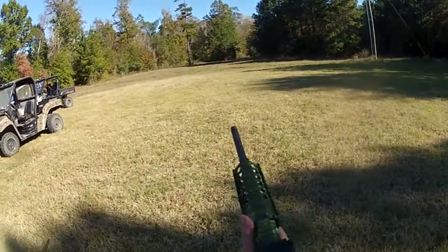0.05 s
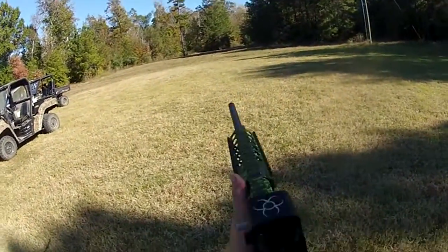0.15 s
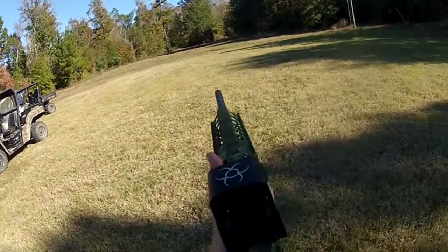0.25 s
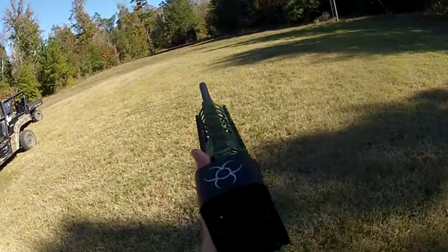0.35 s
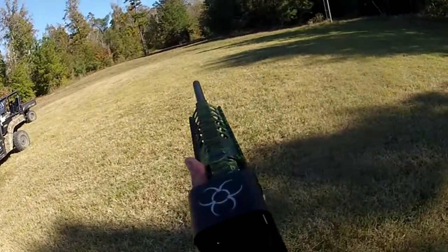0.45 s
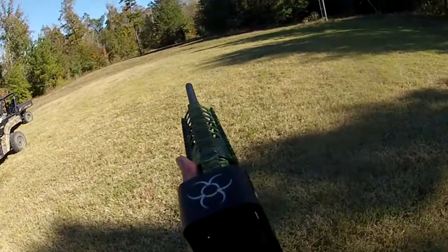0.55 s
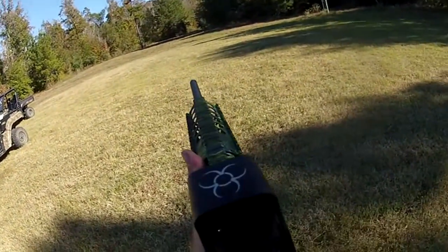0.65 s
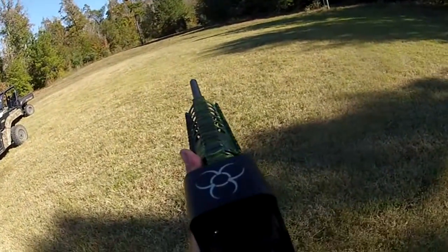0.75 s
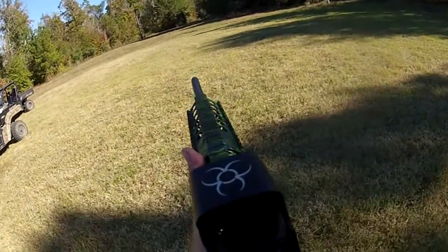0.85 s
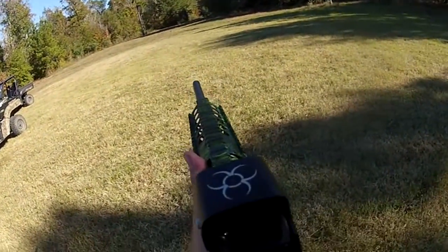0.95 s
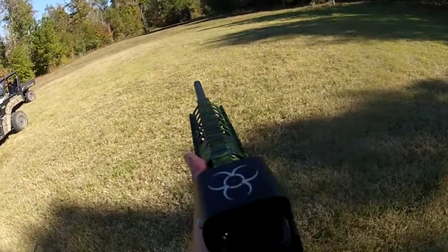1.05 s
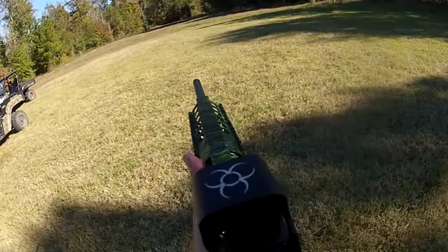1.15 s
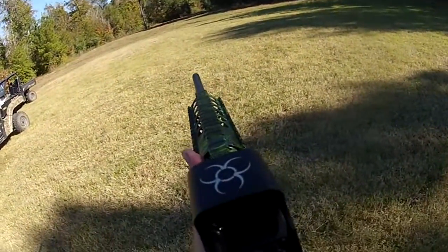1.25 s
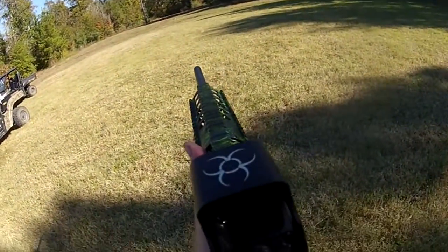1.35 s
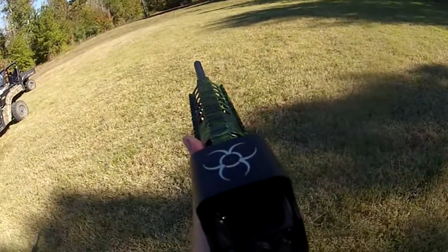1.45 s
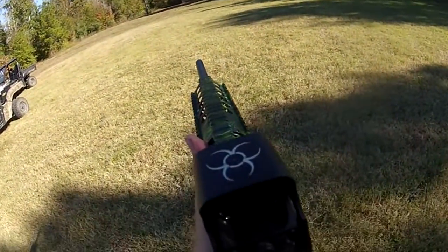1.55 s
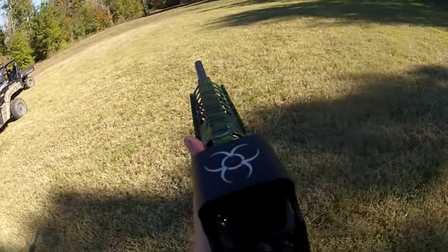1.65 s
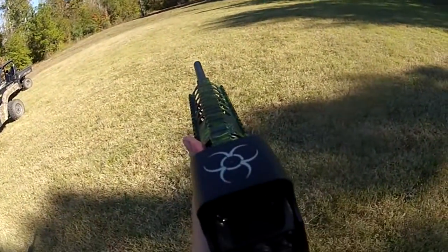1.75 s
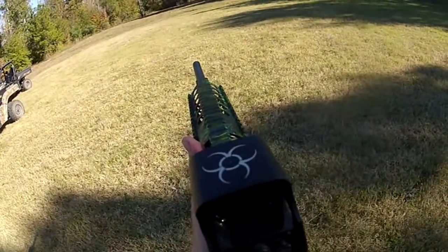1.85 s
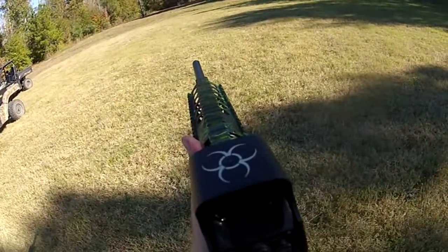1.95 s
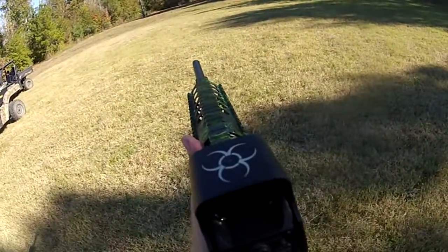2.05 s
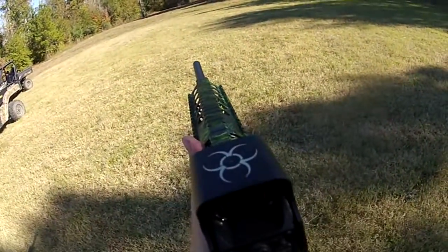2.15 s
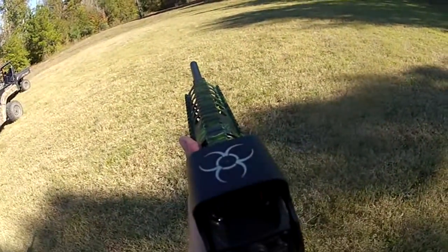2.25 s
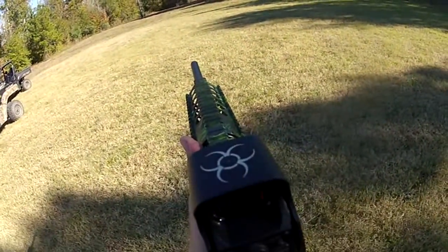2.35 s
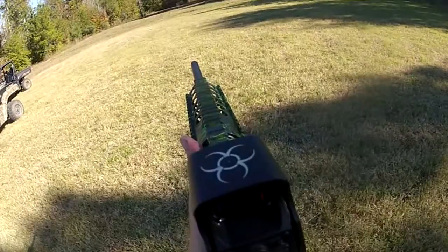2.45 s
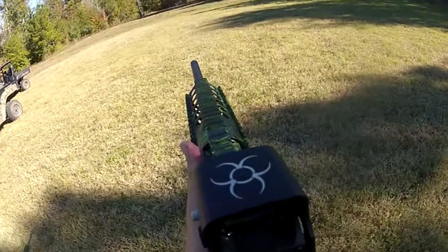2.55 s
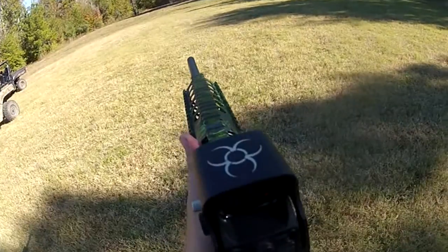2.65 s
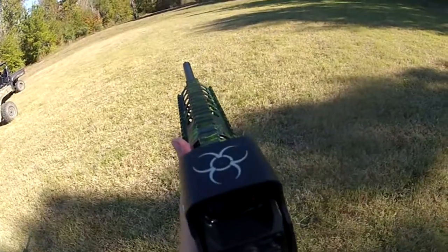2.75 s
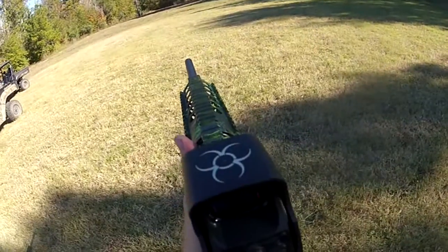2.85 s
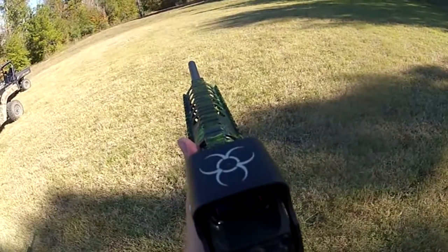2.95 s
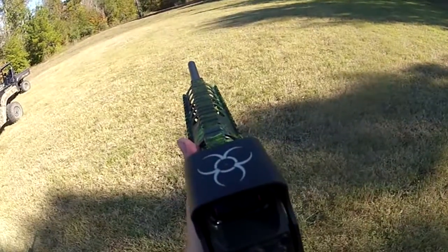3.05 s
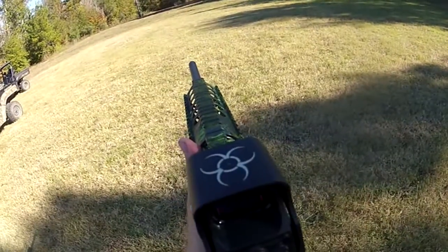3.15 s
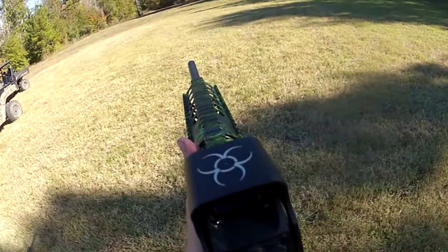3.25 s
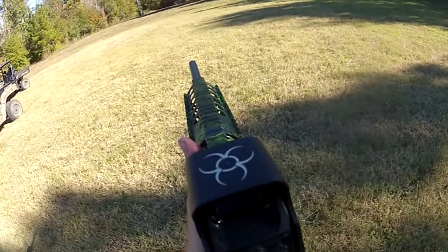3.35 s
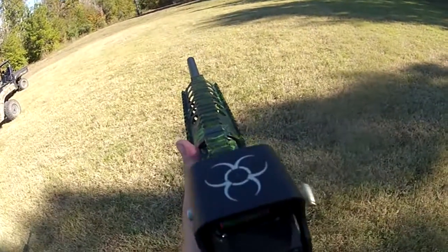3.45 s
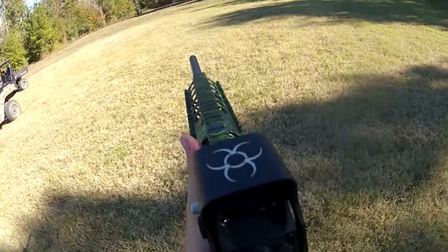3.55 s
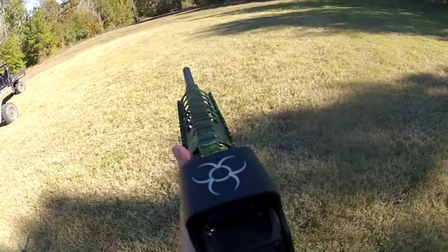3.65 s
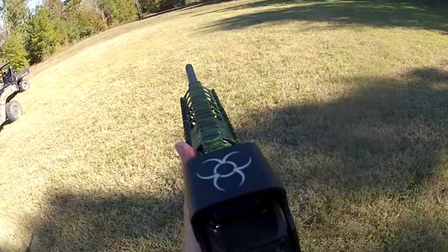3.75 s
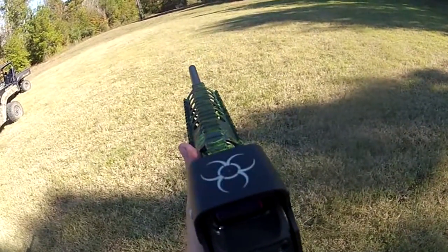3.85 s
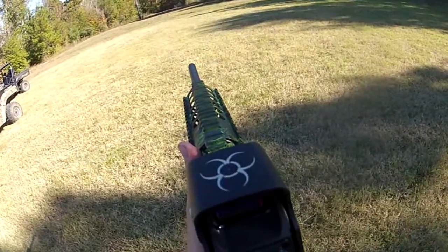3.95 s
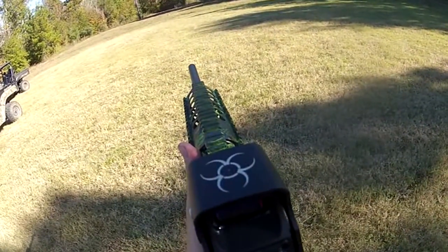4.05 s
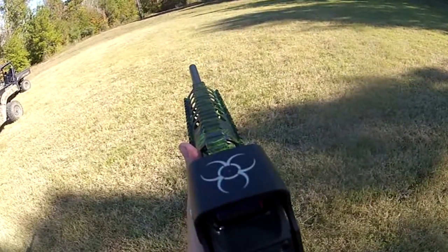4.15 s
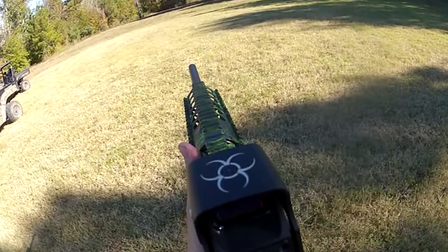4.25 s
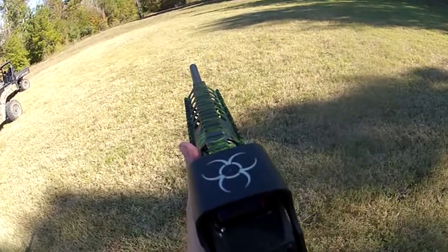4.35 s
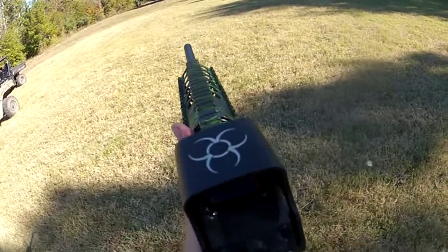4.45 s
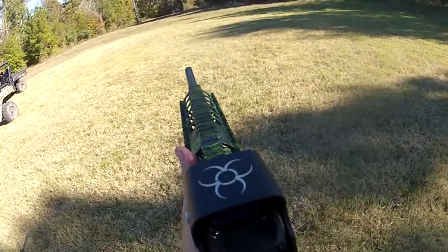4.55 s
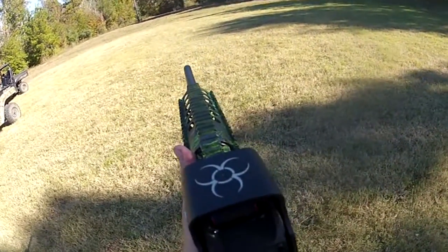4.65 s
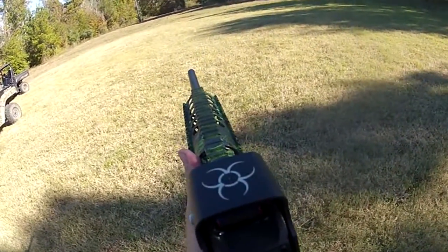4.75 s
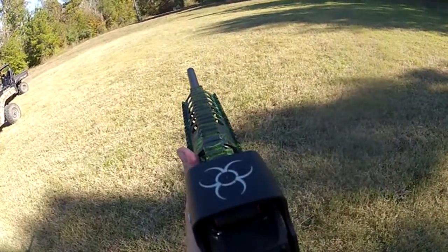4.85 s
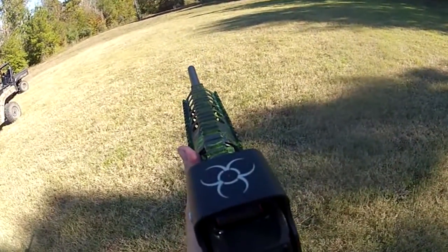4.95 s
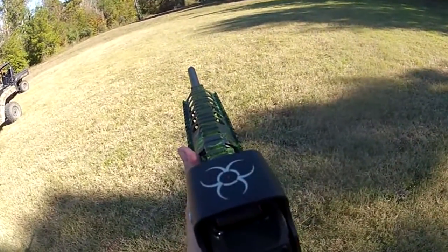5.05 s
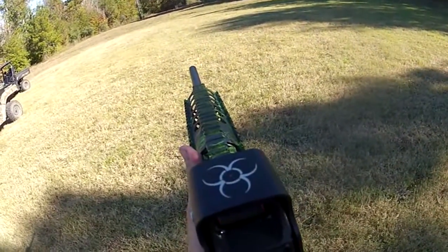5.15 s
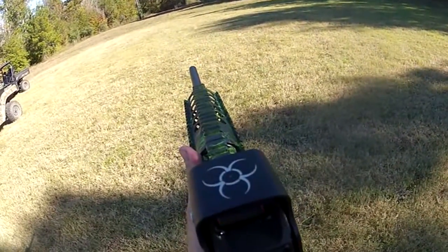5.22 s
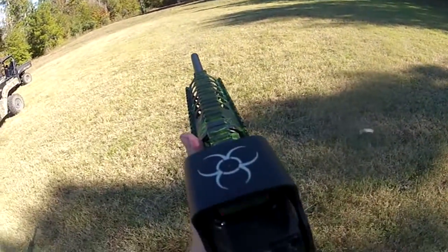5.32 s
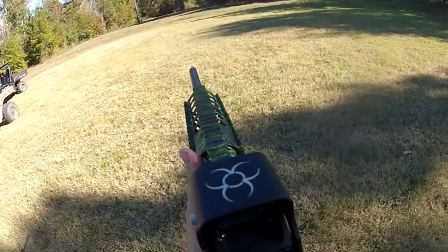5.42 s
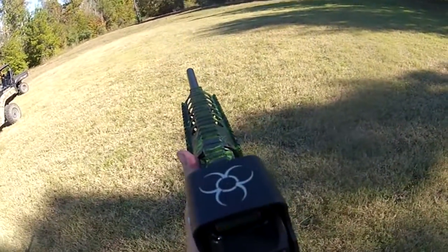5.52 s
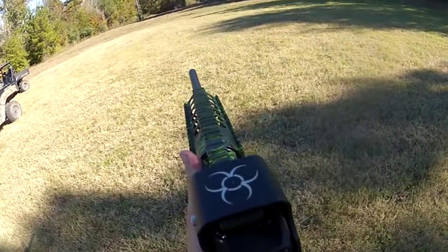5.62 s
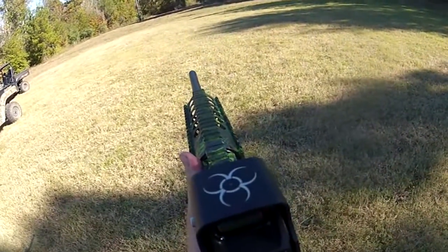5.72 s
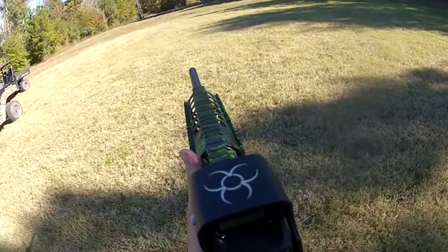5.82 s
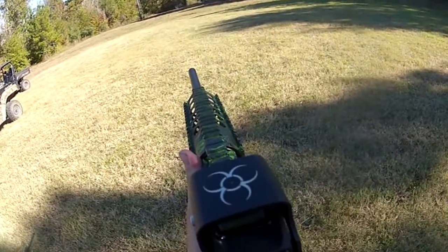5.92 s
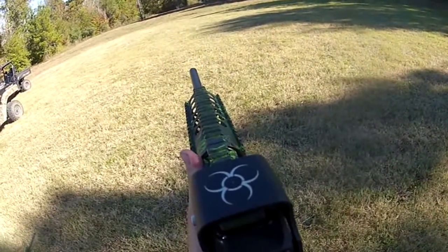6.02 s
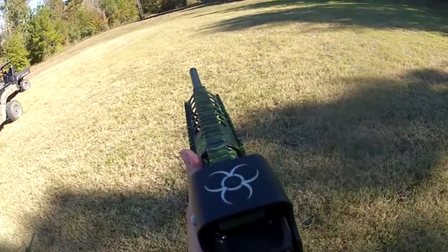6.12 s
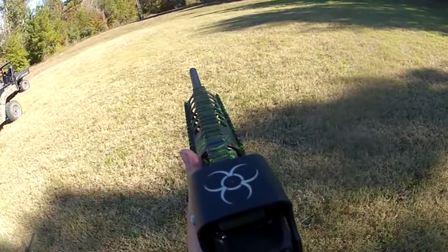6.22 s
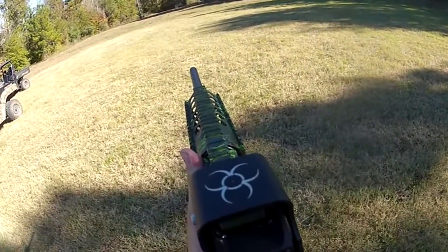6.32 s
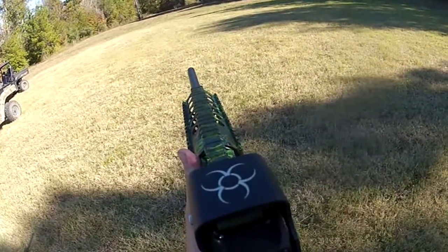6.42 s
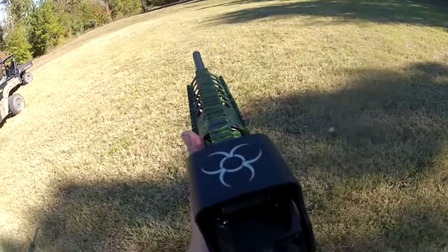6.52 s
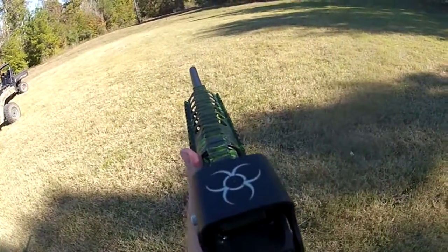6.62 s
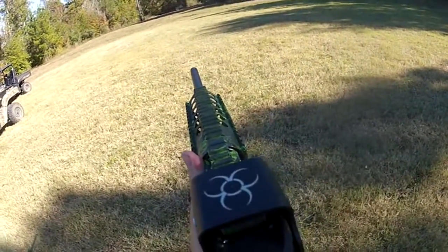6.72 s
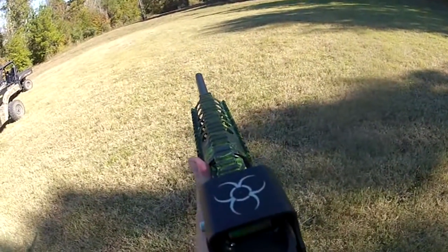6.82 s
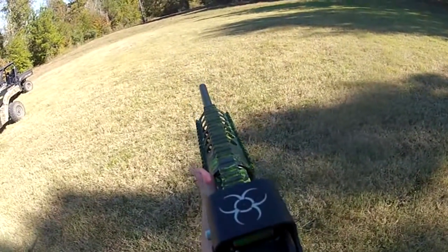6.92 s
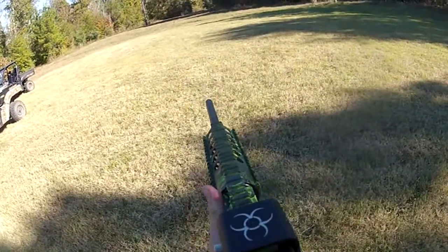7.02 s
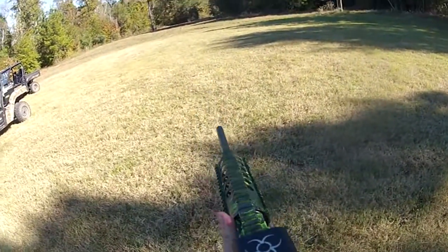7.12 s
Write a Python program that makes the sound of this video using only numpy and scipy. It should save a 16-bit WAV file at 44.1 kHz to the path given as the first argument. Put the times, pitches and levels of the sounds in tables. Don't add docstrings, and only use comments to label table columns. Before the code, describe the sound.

Close, body-worn sound from a small camera in a hard case, in an open field edged by trees. Low wind rumbles unevenly over a quiet hissy air floor. Around 0.3 s come a dull stock knock and a tiny latch click, then a faint tap at 0.5 s. Quiet wind continues until 2.6 s, when the rifle fires; further single shots follow at 3.5, 4.4, 5.3 and 6.5 s. Each begins with a tiny hammer tick and a very short, flat-clipped blast. Within about 0.15 s the bolt hits its rear stop, brass scrapes and rattles, the spring twangs faintly and the bolt slams home with a bounce, over soft low recoil thuds. A rough, crackling echo swells from the tree line about a quarter second after each blast, then deeper, duller returns fade away. The tone is boxy with a gritty metallic upper edge. The last echo trails off near 7.2 s.

```python
import sys
import numpy as np
from scipy import signal
from scipy.fft import rfft, irfft, next_fast_len
from scipy.io import wavfile
from scipy.ndimage import uniform_filter1d

SR = 44100
rng = np.random.default_rng(int(sys.argv[2]) if len(sys.argv) > 2 else 0)


def volts(x):
    e = np.asarray(x, float) / 20
    return 10 ** e


def to_wav(s):
    ch = np.atleast_2d(s).T
    pcm = np.round(np.clip(ch, -1, 1) * 32767)
    wavfile.write(sys.argv[1], SR, pcm.astype(np.int16))


N = 316638

# [t/s, far echo level/dB, roar length/s, gas push level/dB, gas push f/Hz]
SHOTS = [
    (2.5975, -1, 0.01, 6.5, 260),
    (3.4990, 0, .0105, 8.5, 300),
    (4.4301, 0.5, 0.0087, -5, 331),
    (5.3219, 0, 0.0083, 1.5, 584),
    (6.5142, 0, 0.01, 5, 558),
]
# [t/s, level/dB, hammer level of that cycle/dB]
BOLT = [
    (2.641, -2, -13),
    (3.539, 0.5, -10),
    (4.473, -3, -11.5),
    (5.361, -6, -12.5),
    (6.553, -1.5, -14),
]
# [f/Hz, level/dB]
STEEL = [(200, -16), (1000, -21), (1700, -1.5), (2500, 1.5), (3500, 3), (4500, 5), (6000, 9)]


def evened(x):
    return x / np.sqrt(np.mean(x ** 2) + 1e-20)


def read(points, hz):
    f, value = np.transpose(points)
    return np.interp(np.log(hz + 1), np.log(f + 1), value)


def add(mix, s, sound):
    part = mix[round(s * SR):][:len(sound)]
    part += sound[:len(part)]


def coloured(x, db_of):
    gain_db = np.maximum(db_of(abs(np.fft.fftfreq(8192, 1 / SR))), -100)
    log_gain = np.log(volts(gain_db))
    phase = -signal.hilbert(log_gain).imag
    taps = np.fft.ifft(np.exp(log_gain + 1j * phase)).real[:4096]
    return signal.oaconvolve(x, taps)[:len(x)]


def case_db(hz, base_db=-24):
    # [f/Hz, width/Hz, level/dB]
    resonances = [(957, 333, -12), (1284.5, 79, -3), (1796, 120, -5.5), (2162, 51, -3.5), (2407, 133, -1),
                  (3080, 81, -16), (3074, 120, -15.5), (3480, 340, -15.5), (5450, 400, -23)]
    power = sum(volts(2 * db) / (1 + (2 * (hz - f) / width) ** 2) for f, width, db in resonances)
    return 10 * np.log10(power + volts(2 * base_db))


def cased(x, source):
    def db_of(f):
        return read(source, f) + case_db(f) - 40 * (f > 6300)

    hz = np.linspace(0, SR / 2, 2000)
    return coloured(x, db_of) / np.sqrt(np.mean(volts(2 * db_of(hz))))


def knocks(events, source, rise_s=0.00016, spike=1.0, rattle_db=4.5):
    out, t = np.zeros(N), np.arange(6000) / SR
    for s, db, t60_s in events:
        hiss, lumps = rng.standard_normal((len(t), 2)).T
        rattle = volts(rattle_db * evened(uniform_filter1d(lumps, 30)))
        crack = 0.6 + spike * np.exp(-t / 0.0018)
        shape = volts(db - 60 * t / t60_s) * np.minimum(t / rise_s, 1) * crack
        add(out, s, shape * rattle * hiss * 0.5)
    return cased(out, source)


def in_cycle(times, part, db=0):
    delay_s, part_db, t60_s = part
    return np.transpose(np.broadcast_arrays(times + delay_s, db + part_db, t60_s))


def blasts(db=18, rise_s=0.0014, fall_s=0.00091):
    # [f/Hz, level/dB]
    colour = [(60, -1.5), (300, 10.5), (700, -2), (1300, -2.5), (2300, 2.5), (3500, 0), (6000, 13.5)]
    out, t = np.zeros(N), np.arange(2000) / SR
    for s, _, hold_s, push_db, push_hz in SHOTS:
        decay = np.exp(-np.maximum(t - hold_s + 0.0017, 0) / fall_s)
        shape = np.minimum(t / rise_s, 1) ** 3 * decay
        roar = volts(db) * cased(rng.standard_normal(2 * len(t)), colour)[len(t):]
        push = volts(push_db) * np.sin(2 * np.pi * (push_hz * t + rng.random()))
        add(out, s, shape * (roar + push))
    return out


def echoes(trunks_db=0.7, clumps_db=2.0, slap_s=0.0018, crack=2.3):
    # [delay/s, level/dB, build-up/(dB/s), fade/(dB/s)]
    woods = [
        (0.014, -12, 3401, 1141),
        (0.069, -28, 98, 203),
        (0.149, -22, 405, 162),
        (0.264, -16.5, 453, 57.5),
        (.3, -22.5, 107, 87),
        (0.458, -19.5, 77, 98.5),
        (0.622, -26.5, 57, 34.5),
    ]
    # [t/s, level over diffuse echo/dB]
    slaps = [(2.8607, -1), (2.8757, 3), (3.005, 1), (3.195, -7), (3.221, -2), (3.756, 4), (3.762, -25),
             (3.777, -1), (3.905, -7), (3.935, -2), (4.096, 4), (4.685, 2.5), (4.691, 0), (4.711, -2.5),
             (4.869, 0), (4.998, 3), (5.053, -4), (5.5787, 7), (5.5847, -3), (5.5997, 3.5), (5.7577, 1.5),
             (5.8897, 5), (6.771, 3.5), (6.792, -3), (6.92, -4), (6.95, -3), (7.049, 2), (7.082, 2)]
    # [f/Hz, loss/(dB/s)]
    air_loss = [(300, -6), (1000, -12), (2500, 2), (4000, 16), (6000, 31.5)]
    # [f/Hz, level/dB]
    colour = [(60, -17), (300, -7.5), (600, -7.5), (1000, -2.5), (3000, 5), (4500, 5.5), (6000, 9)]
    out, t = np.zeros(N), np.arange(round(1.5 * SR)) / SR
    trunks = volts(trunks_db * evened(uniform_filter1d(rng.standard_normal(len(t)), 150)))
    returns = sum(volts(2 * (db - np.maximum(rise * (at - t), fade * (t - at))))
                  for at, db, rise, fade in woods)
    for s, far_db, *_ in SHOTS:
        delay, slap_db = np.transpose([(at - s, db) for at, db in slaps if 0 < at - s < 0.8])
        after = np.maximum(t[:, None] - delay, 0) / slap_s
        bumps = after * np.exp(1 - after)
        scatter = trunks * (1 + bumps @ volts(slap_db)) * rng.standard_normal(len(t))
        scatter[np.round((delay + 0.0008) * SR).astype(int)] += crack * volts(slap_db)
        hz, frame_t, z = signal.stft(scatter, SR, nperseg=256)
        patches = uniform_filter1d(rng.standard_normal(z.shape), 5, 0)
        clumps = evened(uniform_filter1d(patches, 4, 1))
        colour_db = clumps_db * clumps - read(air_loss, hz)[:, None] * frame_t
        roar = signal.istft(z * volts(colour_db), SR, nperseg=256)[1][:len(t)]
        add(out, s, volts(far_db * (t > 0.245)) * np.sqrt(returns) * roar)
    return cased(out, colour)


def bolt():
    # [t/s, level/dB]
    landing = [
        (2.7311, -2.5),
        (3.634, -4),
        (4.572, -3),
        (5.4562, -3),
        (6.6565, -3),
    ]
    # [delay/s, level/dB, t60/s]
    bounces = [
        (0, 3, .08),
        (.0058, 0, .052),
        (0.011, -21, .06),
    ]
    # [delay/s, level/dB, t60/s]
    clack = (.002, -1, 0.028)
    # [delay/s, level/dB, t60/s]
    pin = (-0.0028, -12, 0.083)
    # [f/Hz, level/dB]
    home_colour = [(100, -17), (250, 3), (1000, -18.5), (1600, -17), (2000, 2), (2500, 2.5), (3500, 8.5),
                   (4500, 9), (6000, -1.5)]
    shot = np.transpose(SHOTS)[0]
    rear, rear_db, _ = np.transpose(BOLT)
    home, home_db = np.transpose(landing)
    hits = np.concatenate([in_cycle(home, bounce, home_db) for bounce in bounces] + [in_cycle(shot, pin)])
    stop = knocks(in_cycle(rear, (0, 0, 0.07), rear_db), STEEL, rise_s=0.0081)
    strike = knocks(in_cycle(rear, clack, rear_db), STEEL, rise_s=0.00064)
    return stop + strike + knocks(hits, home_colour, rise_s=0.00056, spike=0.3, rattle_db=4.0)


def hammer():
    # [delay/s, level/dB, t60/s]
    fall = (-.0066, 0, 0.032)
    # [f/Hz, level/dB]
    colour = [(200, -16), (1000, -2), (2000, 7), (3000, -3), (4000, 26.5), (6000, 12.5)]
    return knocks(in_cycle(np.transpose(SHOTS)[0], fall, np.transpose(BOLT)[2]), colour)


def spring():
    # [delay/s, level/dB, t60/s]
    turn_round = (.0826, -20.5, 0.047)
    # [f/Hz, level/dB]
    colour = [(2000, -22), (3000, -8), (3500, 5), (4000, 2), (6000, -28)]
    return knocks(in_cycle(np.transpose(SHOTS)[0], turn_round), colour, rise_s=0.00064)


def brass():
    # [delay/s, level/dB, t60/s]
    scrape = (-0.0085, -8.5, 0.089)
    # [t/s, peak level/dB]
    hits = [
        (2.6494, -16),
        (2.6604, -17),
        (3.552, -15),
        (3.5616, -10),
        (4.49, -21),
        (5.3803, -13),
        (6.5635, -26),
        (6.574, -16),
        (6.5793, -9),
    ]
    # [f/Hz, level/dB]
    colour = [(1000, 0.5), (2500, -1.5), (4000, 9), (5000, 9), (5600, 27), (6000, 8.5)]
    events = [*in_cycle(np.transpose(BOLT)[0], scrape), *[(s, db, 0.052) for s, db in hits]]
    return knocks(events, colour, rise_s=0.0014)


def thuds():
    # [buffer stop t/s, buffer level/dB, recoil level/dB, kick level/dB]
    body = [
        (2.6905, -18, -24, -11),
        (3.5895, -15, -20.5, -18),
        (4.527, -15, -27, -8),
        (5.4165, -16.5, -24, -9),
        (6.612, -16.5, -26, -12),
    ]
    out, t = np.zeros(N), np.arange(9000) / SR

    def swing(hz, tau_s):
        return (t / tau_s * np.exp(1 - t / tau_s)) ** 2 * np.sin(2 * np.pi * hz * t)

    for (s, *_), (stop, stop_db, recoil_db, kick_db) in zip(SHOTS, body):
        add(out, s + 0.00078, volts(kick_db) * swing(85, 0.004))
        add(out, s - 0.002, volts(recoil_db) * swing(49, 0.033))
        add(out, stop, volts(stop_db) * swing(31, 0.021))
    return out


def handling():
    # [t/s, peak level/dB, t60/s]
    clicks = [
        (0.347, -26.5, 0.024),
        (0.3544, -39, 0.04),
    ]
    stock_knock = [
        (.3222, -23, .022),
    ]
    tap = [
        (0.4915, -37, 0.035),
    ]
    # [f/Hz, level/dB]
    latch_colour = [(200, -23), (1000, -7), (2000, 2), (3000, -3), (4000, 21), (5200, 22), (6000, 10)]
    stock_colour = [(400, -10), (900, 2), (1100, 14), (1300, 2), (2200, -13), (4000, -23)]
    return knocks(clicks, latch_colour) + knocks(stock_knock, stock_colour) + knocks(tap, STEEL, rise_s=0.00064)


def mirror(rifle):
    # [f/Hz, level/dB]
    strength = [(5700, -41), (6000, -0.5), (7000, -3), (8500, -7), (9700, -12), (10800, -18.5),
                (11400, -29.5), (12000, -66), (12500, -23), (13300, -19), (13600, -23.5), (14000, -40.5),
                (16000, -26)]
    slow_hz = 12000
    folded = 2 * np.cos(2 * np.pi * slow_hz * np.arange(N) / SR) * rifle
    return coloured(folded, lambda f: read(strength, f))


def port_difference(middle):
    # [f/Hz, level/dB]
    ports = [(40, -16), (150, -10), (500, -22), (1500, -33.5), (5000, -22.5), (15000, -28)]
    n_fft = next_fast_len(N)
    gain = volts(read(ports, np.fft.rfftfreq(n_fft, 1 / SR)))
    return irfft(1j * rfft(middle, n_fft) * gain, n_fft)[:N]


def hush(spectrum, patchy_db, window=1024):
    # [f/Hz, level/dB]
    apart_db = [(60, -37), (110, -14.5), (200, -21.5), (380, -16.5), (700, -12), (1290, -10), (2380, -10),
                (4400, -5), (8120, -7), (15000, -25)]
    n_frames, hz = 4 * N // window + 5, np.fft.rfftfreq(window, 1 / SR)
    a, b, c, d, patches = rng.standard_normal((n_frames, len(hz), 5)).T
    patches = evened(uniform_filter1d(uniform_filter1d(patches, 10, 0), 14, 1))
    mid = a + 1j * b
    side = (c + 1j * d) * volts(read(apart_db, hz))[:, None]
    gain = volts(read(spectrum, hz)[:, None] + patchy_db * patches)
    z = np.array([mid + side, mid - side]) * gain
    return evened(signal.istft(z, nperseg=window, noverlap=window * 3 // 4)[1][:, :N])


def wind():
    # [t/s, level/dB]
    course = [(0, -47.5), (.33, -36.5), (.45, -41.5), (.62, -35), (.75, -41.5), (.93, -47), (1.05, -45),
              (1.3, -36), (1.42, -47), (1.72, -50), (1.82, -46), (2.0, -48.5), (2.5, -46.5), (3.3, -49.5),
              (4.3, -48.5), (5.3, -45.5), (6.2, -53.5), (7.18, -45)]
    # [f/Hz, density/dB per Hz]
    gust = [(8, -30.5), (14, 2.5), (32, -3), (46, 3.5), (58, -7.5), (75, -13), (100, -27), (160, -68.5)]
    return volts(np.interp(np.arange(N) / SR, *np.transpose(course))) * hush(gust, 0.93, window=8192)


def air_floor():
    # [f/Hz, density/dB per Hz]
    spectrum = [(65, -5), (110, -4.5), (245, -4.5), (301, -7.5), (327, -9.5), (792, -21), (4940, -31.5),
                (5950, -44), (7010, -34), (10800, -40), (12000, -39.5), (13500, -48), (15000, -86)]
    return volts(-49) * hush(spectrum, 0.35)


def scene(headroom=1.88):
    # [f/Hz, level/dB]
    guard = [(5000, -4.5), (5500, -8), (5850, -12.5), (6000, -21.5), (6300, -65.5)]
    action = hammer() + bolt() + spring() + brass() + handling()
    rifle = headroom * np.tanh((blasts() + echoes() + action) / headroom)
    rifle = coloured(rifle, lambda f: read(guard, f))
    middle = rifle + mirror(rifle) + thuds()
    side = port_difference(middle)
    return middle + np.array([side, -side]) + wind() + air_floor()


def top_cut(x):
    return signal.sosfilt(signal.butter(12, 15670, fs=SR, output="sos"), x)


def record(dry, side_kept_db=-12, overload_db=-37):
    # [f/Hz, level/dB]
    masked = [(10900, -90), (11200, -50), (13700, -42), (14000, -25.5), (16000, -27)]
    left, right = np.clip(dry, -1, 1)
    hz, _, z = signal.stft([left + right, left - right], SR, nperseg=512)
    mid, side = uniform_filter1d(uniform_filter1d(abs(z / 2) ** 2, 9, 1), 5, 2)
    loudest = mid[hz > 600].max(0)
    heard = mid > loudest * volts(2 * read(masked, hz))[:, None]
    wide = side > mid * volts(2 * side_kept_db)
    overloaded = mid.mean(0) > volts(2 * overload_db)
    apart = wide | (hz < 750)[:, None] | overloaded
    mid, side = signal.istft(z * [heard, heard & apart], SR, nperseg=512)[1][:, :N] / 2
    return top_cut(np.array([mid + side, mid - side]))


dry = scene()
out = record(dry)
to_wav(out)
```